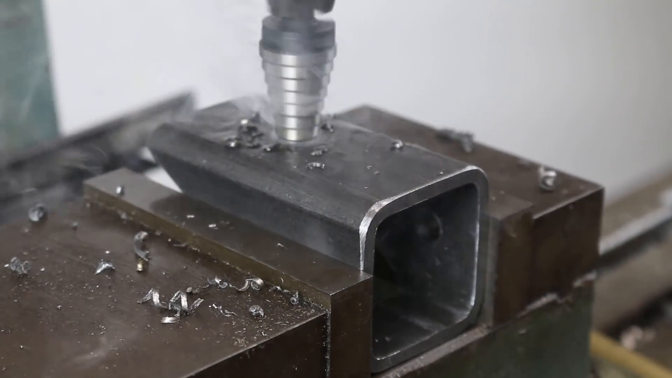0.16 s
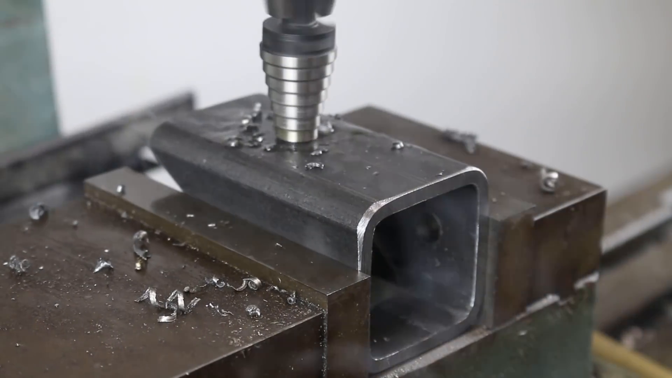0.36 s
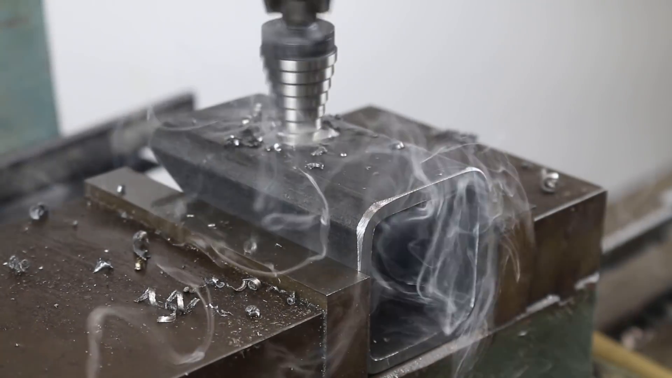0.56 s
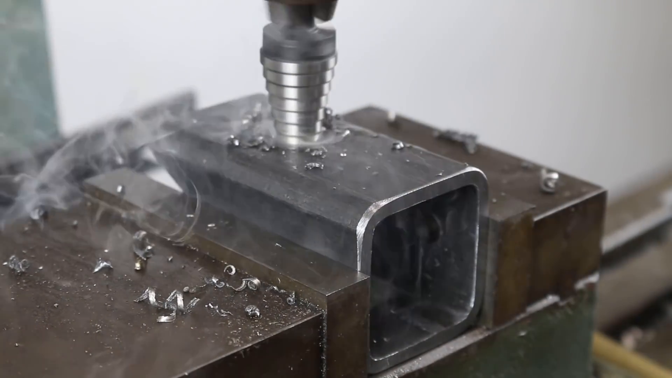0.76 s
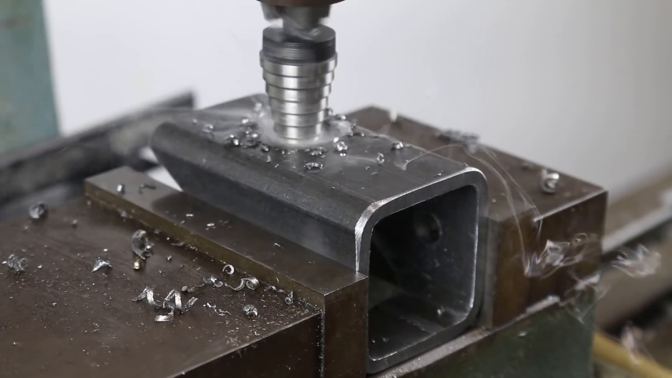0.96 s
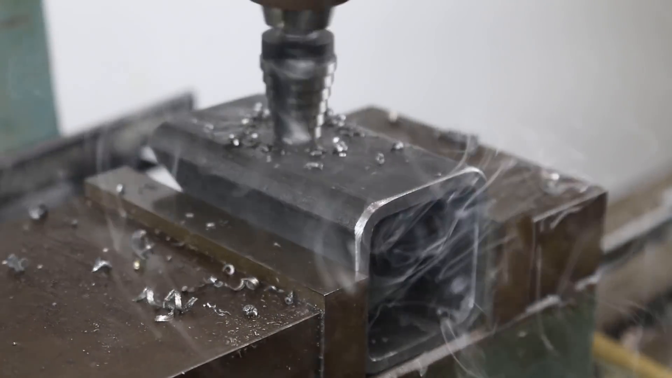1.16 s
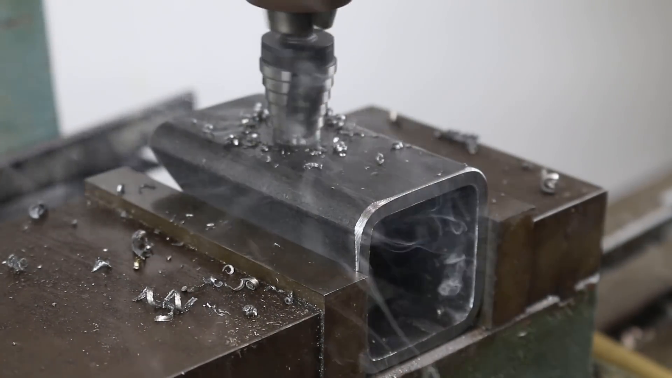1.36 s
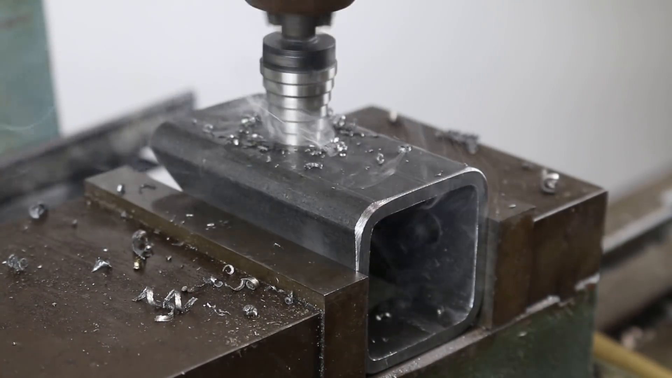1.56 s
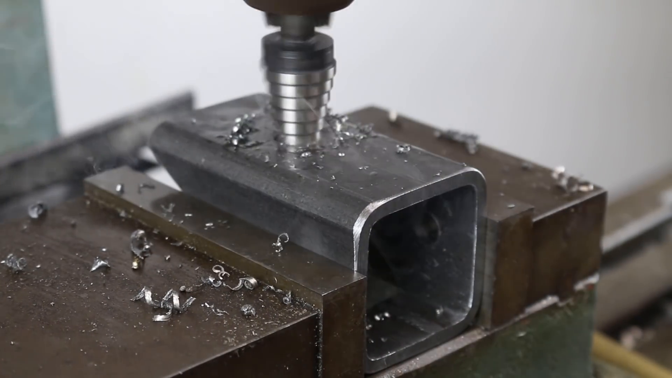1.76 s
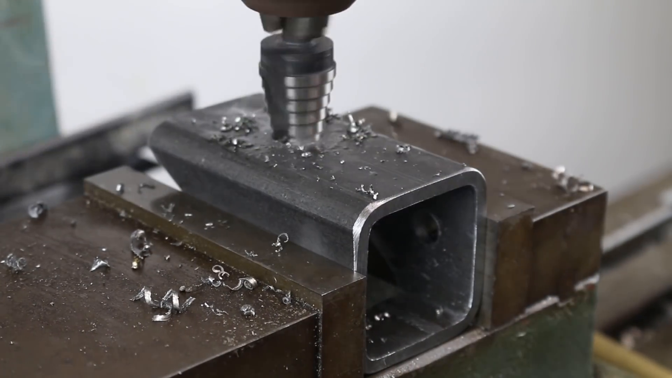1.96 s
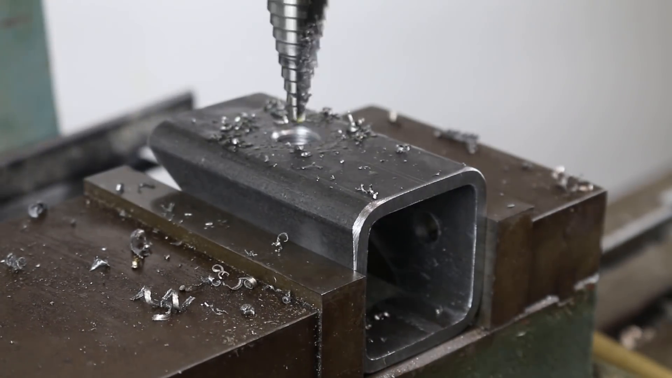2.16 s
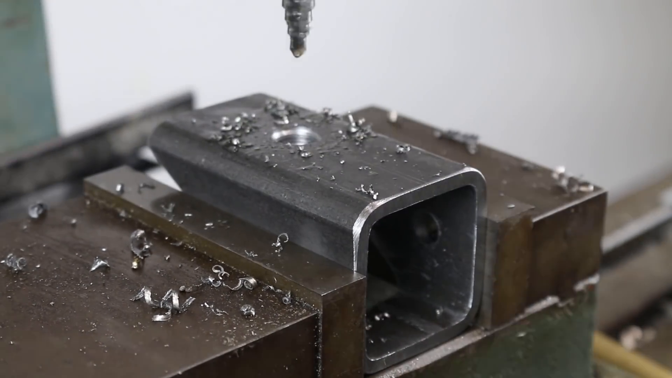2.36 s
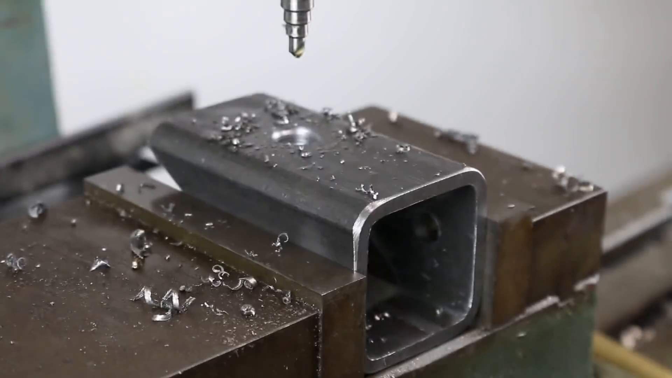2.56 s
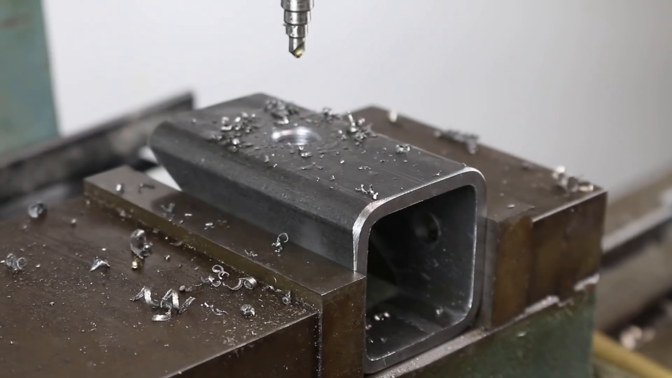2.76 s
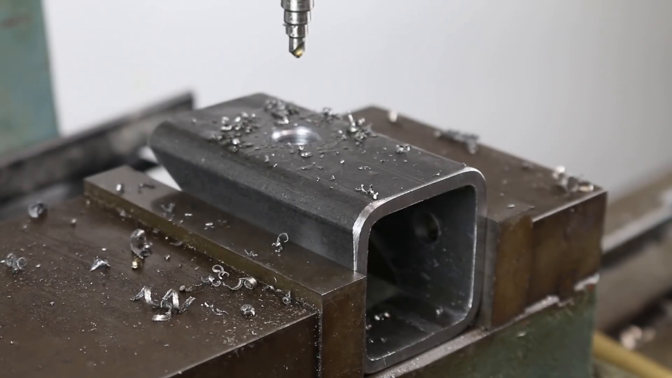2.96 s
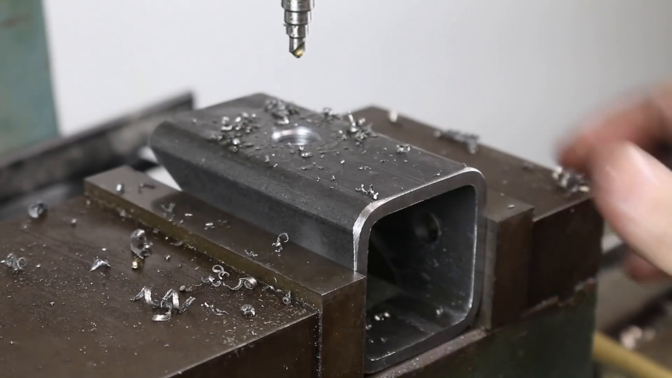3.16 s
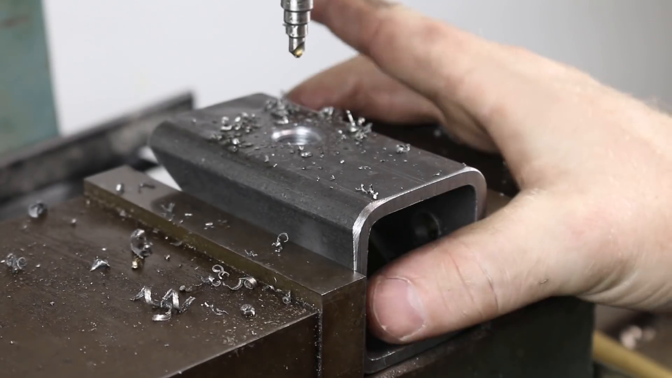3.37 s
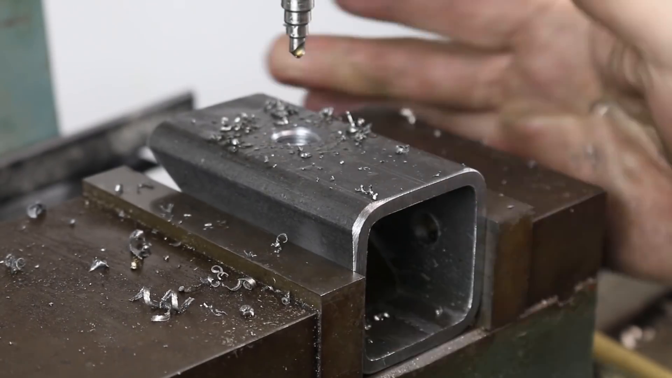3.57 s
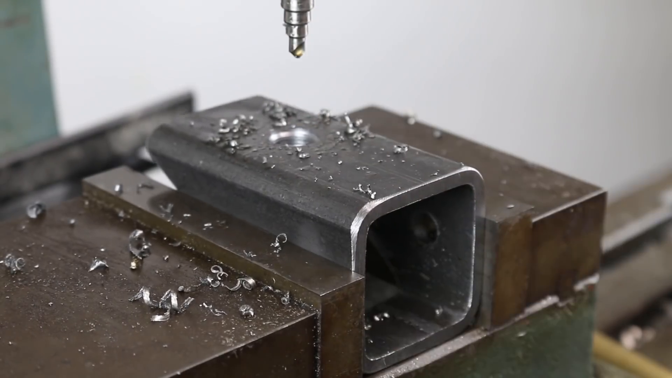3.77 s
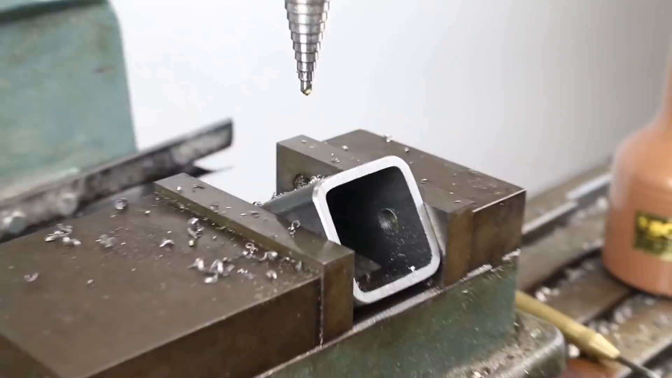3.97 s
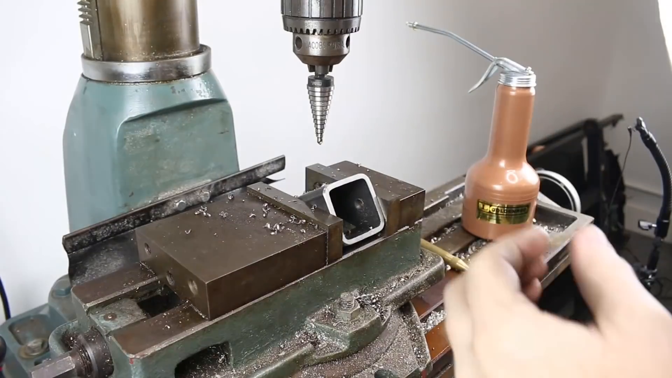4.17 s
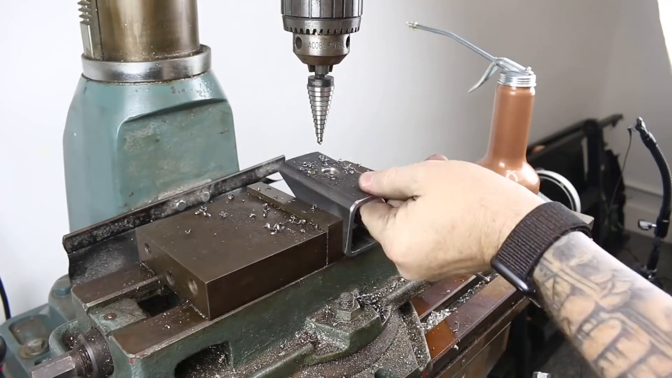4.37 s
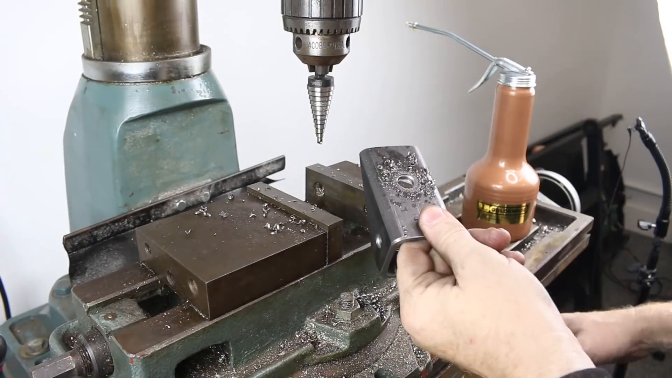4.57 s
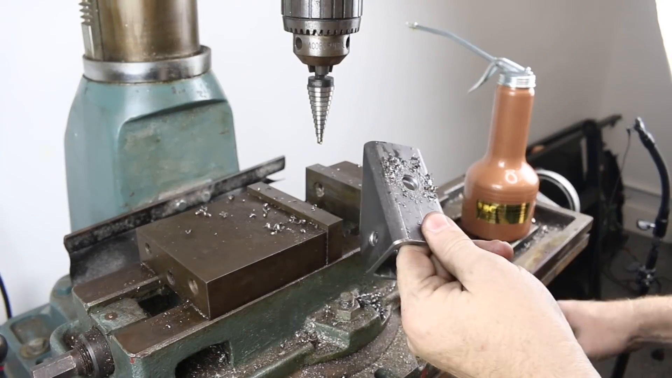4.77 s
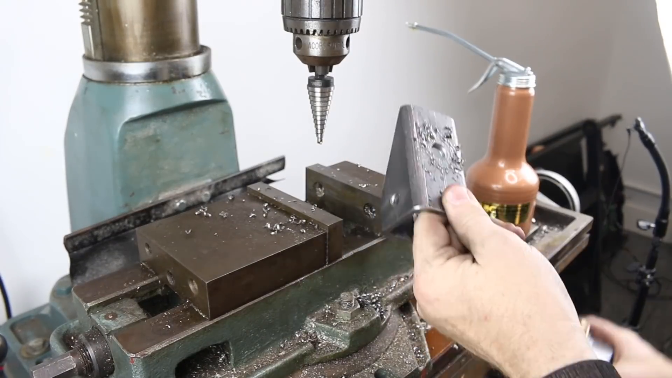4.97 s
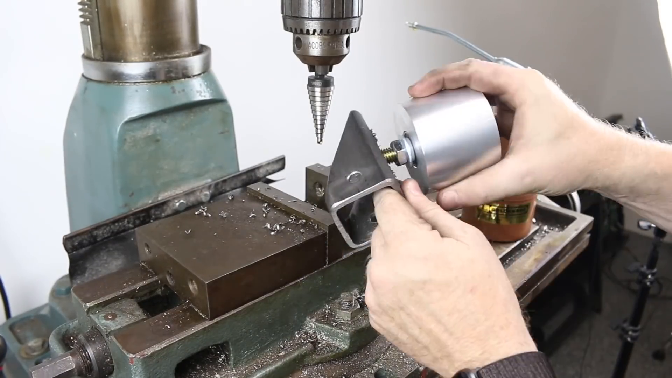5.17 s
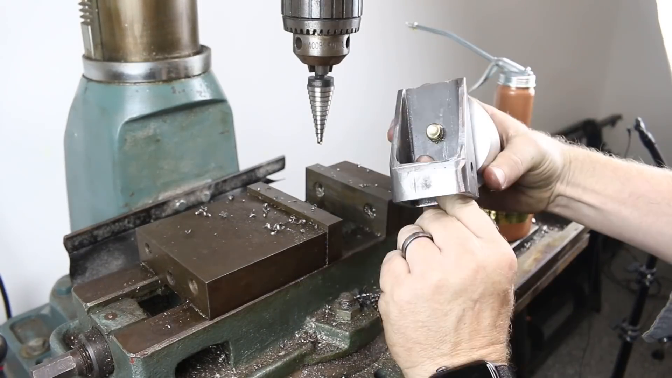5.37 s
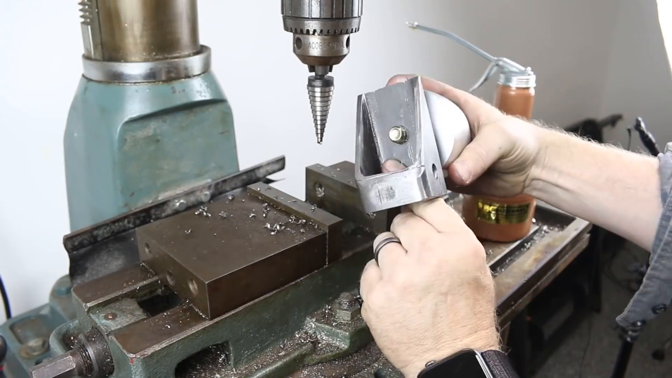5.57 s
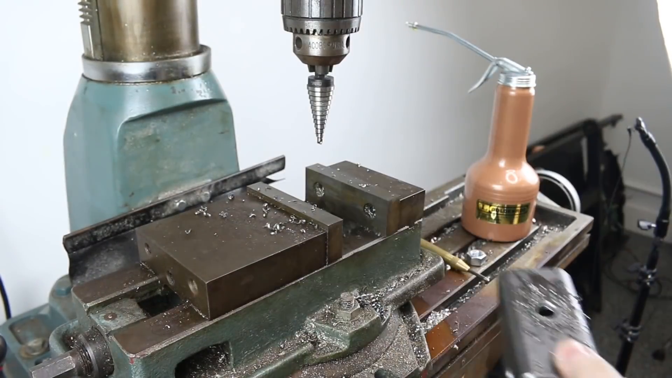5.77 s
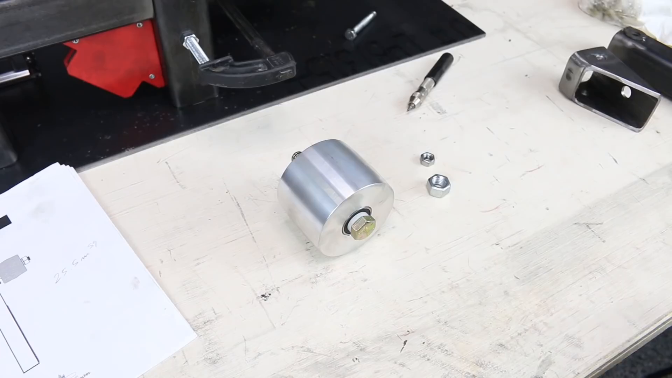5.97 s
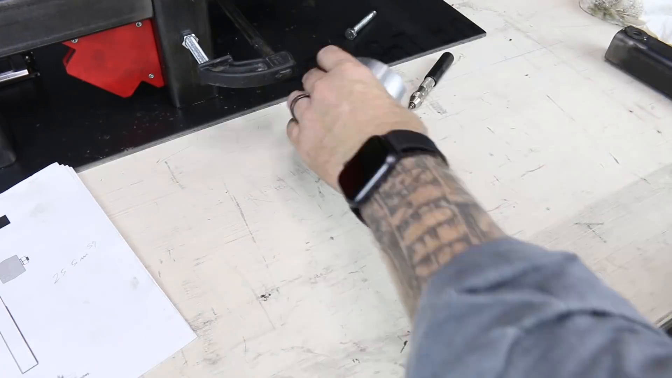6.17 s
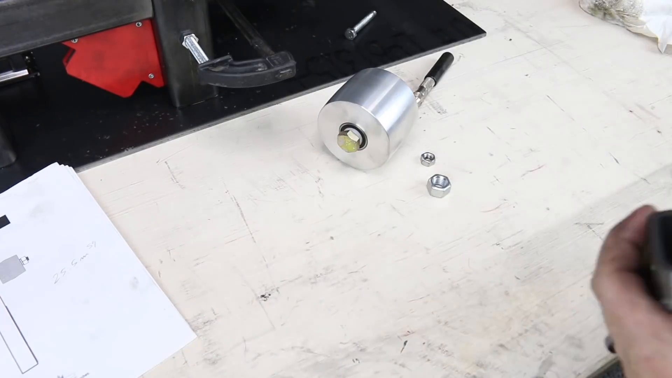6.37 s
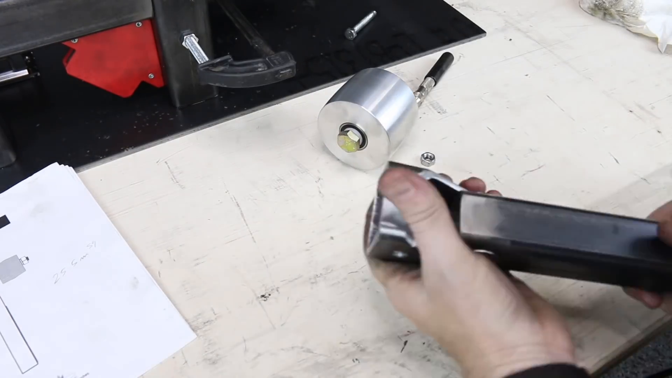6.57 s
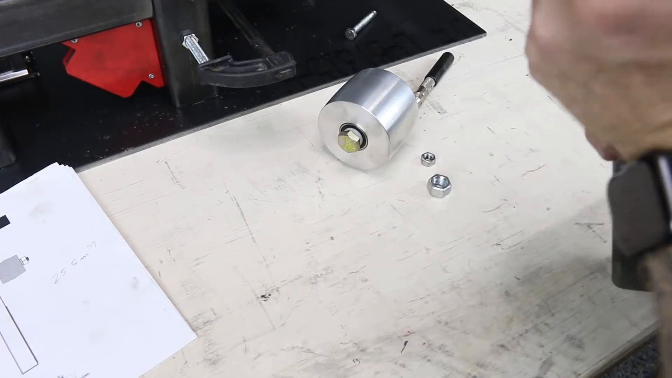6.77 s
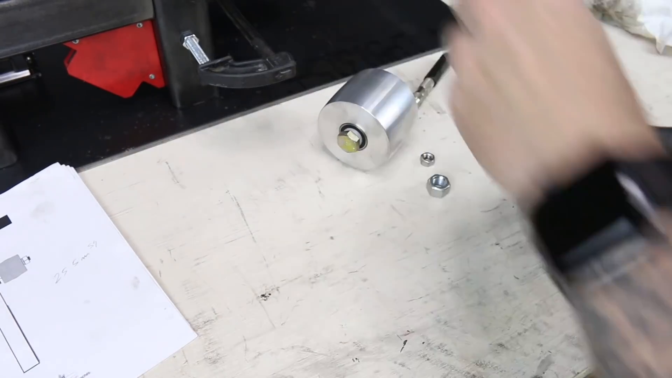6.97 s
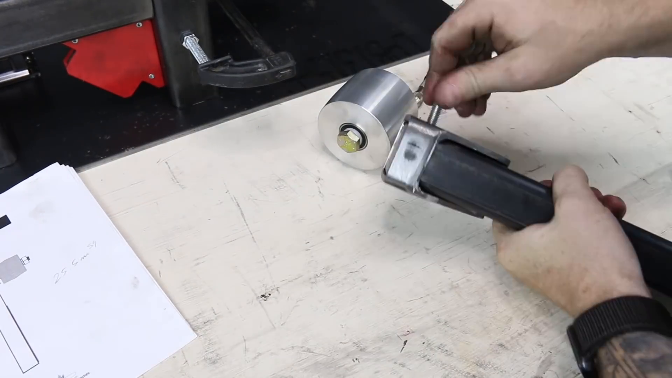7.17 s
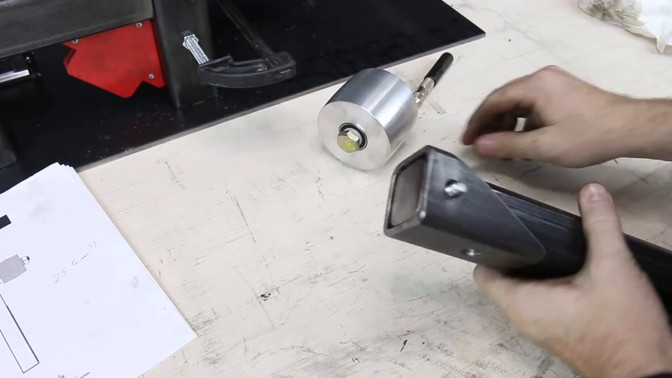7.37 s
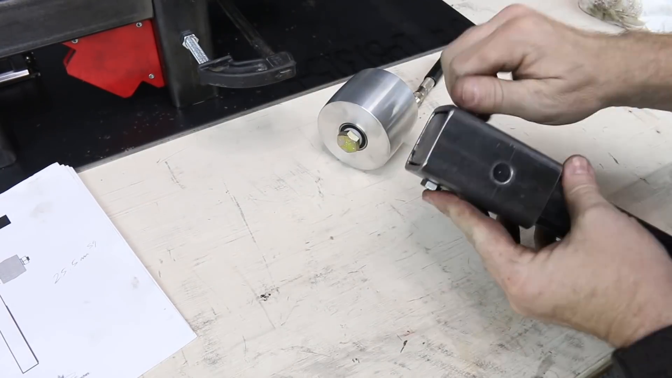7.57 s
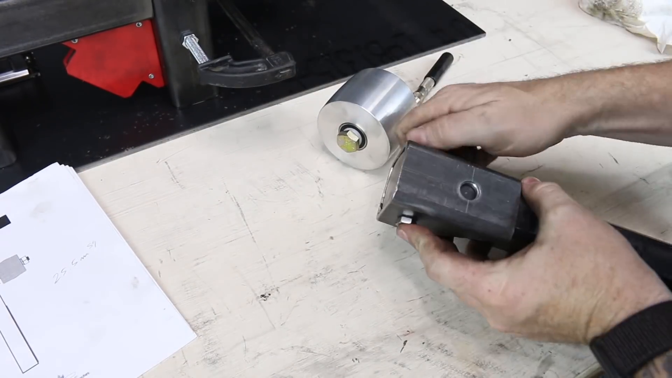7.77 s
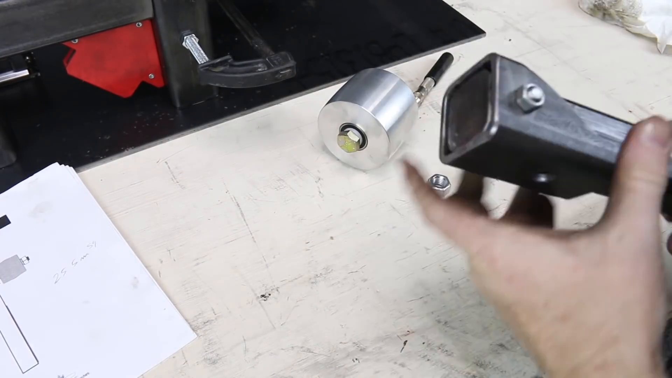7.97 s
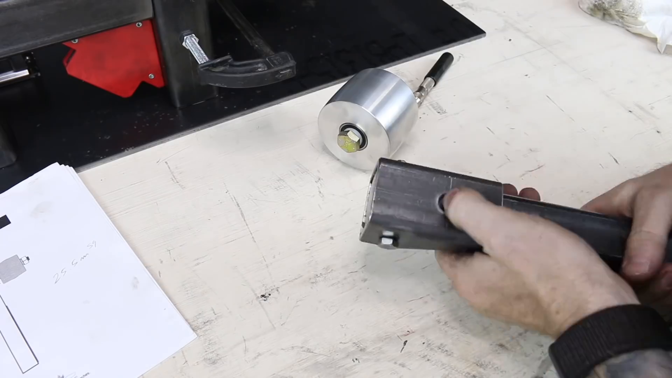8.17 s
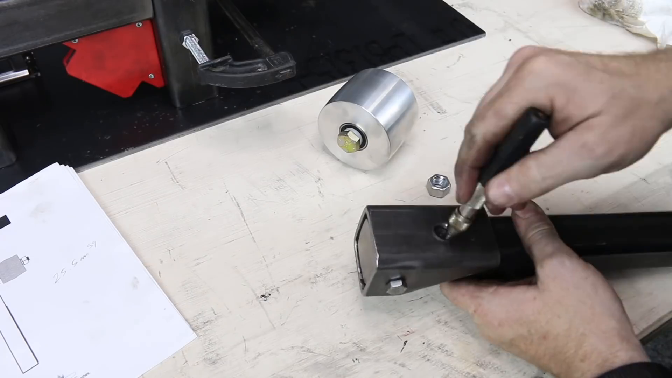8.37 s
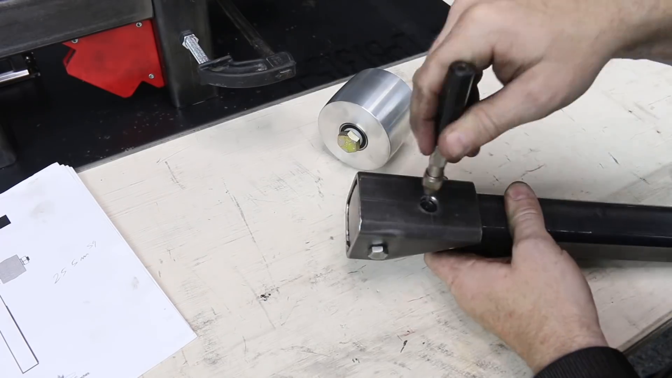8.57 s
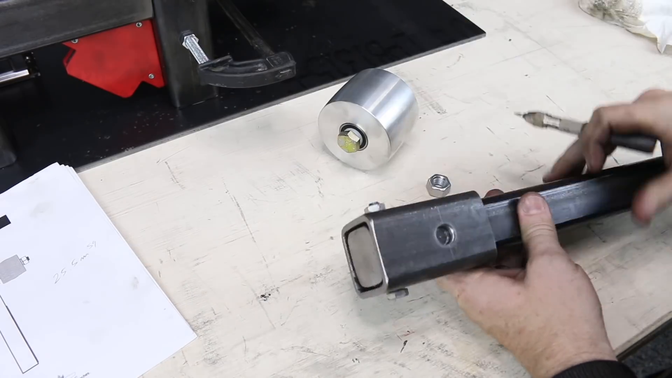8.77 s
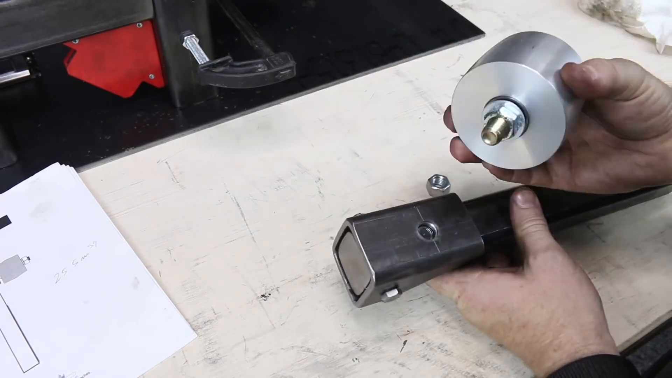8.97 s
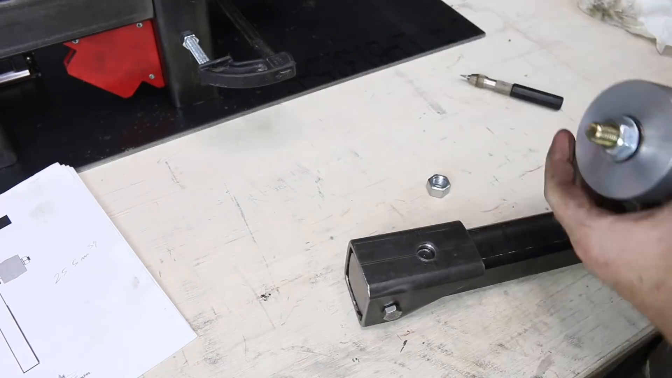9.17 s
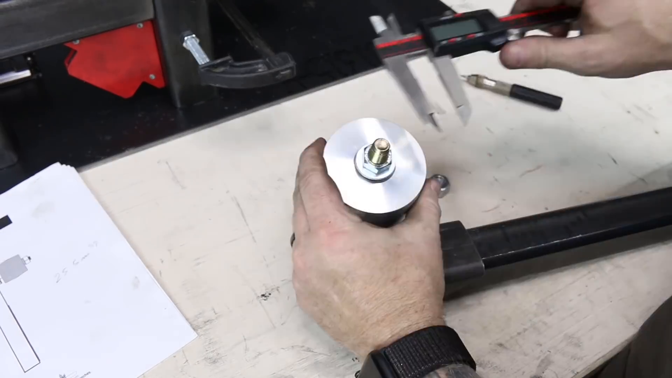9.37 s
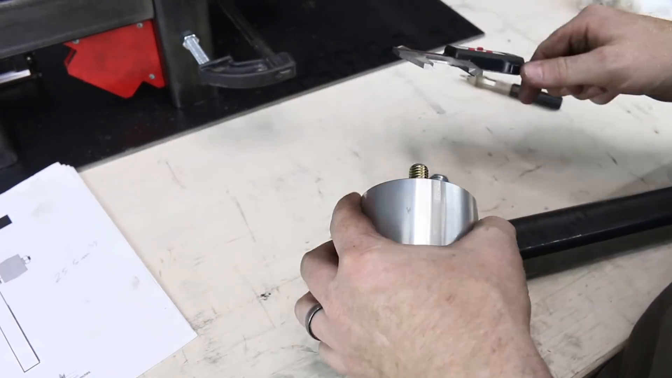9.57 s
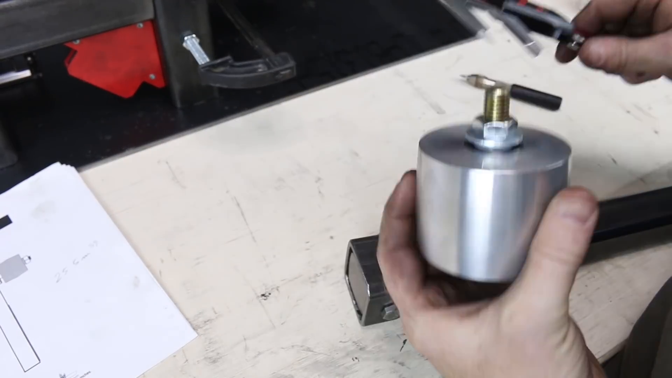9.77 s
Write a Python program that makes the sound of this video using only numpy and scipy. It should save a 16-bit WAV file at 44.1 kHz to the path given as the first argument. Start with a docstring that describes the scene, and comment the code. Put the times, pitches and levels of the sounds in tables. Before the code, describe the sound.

Close, thin, nearly mono sound in a small workshop. A fast, high-pitched drill press motor whines while its bit grinds and growls through steel tube, hissing with chips and squealing sharply as it breaks through. It runs free briefly and switches off. Vise and tube then rattle and clank, loose chips tick and skitter, the tube is set down with hard knocks, and finally parts and tools tap sparsely on a bench.

```python
"""Small workshop, at the drill press, then at a bench; fast motion, so all pitches lie high; thin, near-mono mic.
The motor hums in sine tones and noise; the bit tears a steel tube in random grains that ring it, hiss and squeal,
breaks through, runs free and stops. Vise and tube knock as cracks, rattles and ringing modes; loose chips skitter.
Then the ear moves to the bench: parts and tools tap and scuff its top in the same ways. Each place has its own
noise floor of shaped noise."""
import sys
import numpy as np
from scipy import signal
from scipy.fft import rfft, irfft, next_fast_len
from scipy.io import wavfile

SR = 44100
rng = np.random.default_rng(int(sys.argv[2]) if len(sys.argv) > 2 else 0)


def master(y):
    """Save y as 16-bit WAV."""
    cut = np.clip(np.atleast_2d(y).T, -1, 1)
    pcm = np.round(cut * 32767)  # scale
    wavfile.write(sys.argv[1], SR, pcm.astype(np.int16))


N = 433501
TIME = np.arange(N) / SR
RUN = TIME[:round(2.85 * SR)]   # the drill sounds within this time
STOP_S, MOVE_S = 2.617, 5.973   # the switch is thrown; the ear moves to the bench

# All table levels are relative within their layer unless called rms.
# magnetic hum of the motor [multiple of HUM_HZ, rms level/dB before load and wavering]
HUM = [(1, -50), (2, -52), (3, -43.5), (4, -53.5), (5, -46.5), (7, -60), (8, -72)]
HUM_HZ = 960
EARLY_S = 0.0098   # hum and bright cutting sounds begin to die this much before STOP_S
# load on the motor: lifts the hum fully, motor noise in part, and the chips [t/s, level/dB]
LOAD = [(0, -3), (.5, 1.5), (1.8, 1.5), (2.0, 3), (2.15, -6), (2.6, -4)]
# smaller shaft and gear tones [mean f/Hz, mean rms level/dB]
SHAFTS = [(262, -73.5), (527, -63), (662, -59), (1190, -54), (1224, -54.5), (1655, -53.5), (2052, -57.5),
          (4668, -52), (4734, -59.5)]
# gear mesh, slowed and damped by the cut [idle f/Hz, idle rms level/dB, then per dB of cut above idle:
# f lost/Hz, level lost/dB, wavering/dB]
MESH = [(794.6, -30.5, 0.26, 0.49, 0.08), (830, -37.5, 0.019, 0.37, 0.16)]
MESH_T60_S = .3
# motor noise spectrum [f/Hz, density/dB per Hz]
MOTOR = [(88, -91.5), (150, -59), (440, -37.5), (560, -40), (760, -24), (1040, -21), (1210, -20.5),
         (2600, -22), (2920, -21.5), (3620, -29), (4760, -21), (7000, -30), (16000, -40)]
MOTOR_DB = -40   # before load
# resonances of the motor casing [f/Hz, width/Hz, level/dB]
CASING = [(1750, 74, 1), (2050, 580, -8), (4720, 290, 3.5), (5440, 210, 2.5), (10300, 330, -6.5)]

# resonances of tube and vise under the bit [f/Hz, width/Hz, level/dB]
TUBE = [(481.2, 23.7, 1), (572, 67, -4.5), (597.3, 31, -2), (747, 6, 5.5), (777, 58, -18.5),
        (857, 110, 0.5), (904, 28, -3.5), (1160, 21, -2), (1380, 54, 1), (1693, 30, -5), (2370, 140, -8.5),
        (3940, 24, -6.5), (4300, 39, -4.5), (5430, 40, -11), (5550, 1040, -17)]
# spectrum of the cut itself [f/Hz, density/dB per Hz]
CUT = [(250, -61), (430, -19), (798, -8), (1080, 5), (2630, -45), (2820, 4.5), (3390, -15), (4760, 2.5),
       (7000, -14), (9100, -52)]
# how hard the edge cuts [t/s, level/dB]
FEED = [(0, -48.5), (.24, -48.5), (.36, -54.5), (.52, -46), (.66, -42), (.79, -47.5), (1.1, -48.5),
        (1.32, -43.5), (1.58, -47.5), (1.68, -41.5), (1.86, -51), (1.96, -44.5), (2.05, -41), (2.16, -62.5),
        (2.6, -60)]
IDLE_DB = -65   # feed level below which the mesh is undisturbed
# the edge digs in and the tube growls [t/s, length/s, level/dB]
BITES = [(.88, 0.032, -42.5), (.99, 0.031, -36.5), (1.08, 0.061, -42), (1.22, 0.042, -45),
         (1.995, 0.022, -35.5)]
BITE_RISE_S, BITE_FALL_S = 0.035, 0.037   # swell and die by 20 dB
GROWL_HZ, GROWL_DB = 700, -3   # a bite adds the cut below this pitch, at this level
# spectrum of the chip hiss [f/Hz, density/dB per Hz]
CHIPS = [(3530, -40), (6000, -2), (7190, -13.5), (10100, -3.5), (12200, -8.5), (14900, -8), (16000, -16)]
# where the chips hiss most, swelling slowly [f/Hz, width/Hz, level/dB]
CURLS = [(10480, 280, -6.5), (13700, 120, -11.5), (14550, 220, 11), (15430, 350, 3)]
CHIPS_DB, CHIPS_FOLLOW, CHIPS_UNDER_RASP_DB = -46, 1, -10   # at 0 dB load; share of load; in a rasp
# resonances of the squeal [f/Hz, width/Hz, level/dB]
SQUEAL = [(3180, 200, -4), (3520, 260, -3), (3800, 200, -2), (4030, 120, -1), (5500, 900, -10.5)]
# the edge rasps and squeals [t/s, length/s, level/dB]
RASPS = [(.263, 0.036, -39.5), (.365, 0.0076, -40), (.66, 0.013, -44), (.985, 0.022, -45),
         (1.076, 0.019, -39.5), (1.135, .015, -41), (1.218, 0.041, -44), (1.73, 0.028, -43),
         (1.80, 0.044, -37), (1.836, 0.071, -32.5), (1.975, 0.0055, -40), (1.9955, 0.0075, -25),
         (2.016, 0.0074, -29.5), (2.035, 0.095, -40)]
RISE_S, FALL_S = 0.005, 0.011   # a rasp swells and dies by 20 dB
THROUGH_S, THROUGH_DB = 1.96, 0   # as the wall thins the rasp leans on its lowest pitch
CHATTER_DB = -7.5   # sharp broad clicks within a rasp
RASP_UNDER_CUT_DB = -3   # steady rasp between the bursts

# knocks at the machine [t/s, level/dB, bass level/dB, treble level/dB, middle-band t60/s, favoured f/Hz]
KNOCKS = [(2.602, -47.5, -30, 13.5, .04, 10000), (2.6434, -37, -19, 1, 0.038, 5300),
          (2.851, -48, -8, -10, 0.095, 5160), (2.859, -38.5, -2.5, 1.5, 0.12, 5050),
          (3.1012, -37.5, -8.5, 2, 0.1, 11000), (3.137, -44.5, -3, 4, 0.11, 10400),
          (3.1495, -45.5, 1, -2, 0.2, 5500), (3.2091, -43, 1, -5, 0.22, 4900),
          (3.2503, -50.5, 4, -30, 0.19, 3220), (3.307, -47, 11, -2.5, 0.13, 2010),
          (3.3443, -55, 10, -29, 0.087, 1930), (3.3985, -56, 15, 2.5, 0.13, 2340),
          (3.4178, -50, 6.5, -12, 0.09, 2120), (3.4483, -44, 6, -5.5, 0.16, 2500),
          (3.4934, -63.5, 19.5, 13, 0.09, 1980), (3.554, -60, 12.5, -3, 0.22, 2360),
          (3.6177, -57, 6.5, -15, 0.15, 3180), (3.663, -38, -3, -16, 0.098, 3700),
          (3.6728, -41, -31, -6, 0.14, 2960), (3.698, -50, -22, 12, 0.014, 9000),
          (3.707, -31, -1, 2, 0.12, 6150), (3.7772, -29.5, 0.5, 5, 0.18, 9650),
          (3.7895, -29.5, -2, -5, 0.066, 6300), (3.8273, -20, -7.5, -10, 0.12, 5400),
          (3.864, -32.5, -16, 5.5, 0.031, 6450), (4.1767, -46, -13, 2, 0.014, 4640),
          (4.187, -58, -25, 7, 0.092, 2230), (4.251, -42, -21, 2.5, 0.017, 3950),
          (4.3114, -57, -25, 9, 0.16, 8980), (4.4153, -51, 3.5, 0, 0.47, 3300),
          (4.4306, -43.5, 6, 8.5, 0.079, 9500), (4.4776, -40.5, 4.5, 0, 0.19, 4220),
          (4.49, -30.5, -2, 1.5, 0.089, 3300), (4.717, -54.5, 7.5, -6, 0.31, 2040),
          (4.9188, -58, -5, 5.5, 0.095, 2480), (5.002, -54.5, 7.5, -5, 0.14, 1980),
          (5.0228, -49.5, 4, -1, 0.085, 2040), (5.8239, -19.5, -5, -3.5, 0.11, 4020),
          (5.8612, -20.5, -2, -3, 0.061, 4030), (5.8656, -41.5, 10, 9.5, 0.14, 2040)]
LIFT_S, DOWN_S = 4.4, 5.8   # knocks between fall on the tube in the hand, later ones as it is laid down
# ringing modes of the vise [mean f/Hz, level/dB, longest t60/s]
VISE = [(497, -9, 0.18), (808, -1, 0.2), (847, -7, 0.15), (1168, -7.5, 0.2), (1361, -2.5, 0.15),
        (2020, 7, 0.14), (2500, -1, 0.23), (3200, -0.5, 0.2), (4060, -4.5, 0.25), (5200, -12.5, 0.022),
        (5730, -9, 0.066), (5400, -21, 0.13), (630, -24, 0.087)]
# ringing modes of the tube in the hand [mean f/Hz, level/dB, longest t60/s]
LIFTED = [(1143, -6, 0.13), (1677, 6, 0.17), (1960, 2, 0.15), (3020, -5, .08), (3100, 3, .12),
          (4330, 0, .15), (4970, -5, .05), (5400, 5, 0.036)]
# ringing modes of the tube laid on the machine table [mean f/Hz, level/dB, longest t60/s]
SET_DOWN = [(800, -12, 0.11), (1210, -0.5, .2), (1310, -3, 0.08), (1980, 13, 0.15), (3230, 1, .12),
            (3870, -11, .05), (4350, -11, .1), (5740, 4, 0.044)]
SNAP_DB, SNAP_T60_S = -17, 0.0041   # brief extra rattle at the start, relative to the rattle
SHIFT = .014   # grip and seating move each mode from blow to blow (spread, share of pitch)

# loose chips slide off the lifted tube in jerks [t/s, level/dB]
JERKS = [(4.627, -46), (4.663, -50), (4.69, -59), (4.717, -52), (4.751, -54), (4.786, -54), (4.826, -52.5)]
JERK_RISE_S, JERK_FALL_S = 0.011, 0.031   # swell and die by 20 dB
# single chips drop with a tick [t/s, level/dB]
TICKS = [(3.0, -58), (3.2, -56), (3.267, -61), (3.343, -58), (3.391, -56), (3.419, -53), (3.462, -52),
         (3.472, -55), (5.313, -51), (5.723, -56)]
TICK_RISE_S, TICK_FALL_S = .001, .01   # swell and die by 20 dB
# spectrum of loose chips on steel [f/Hz, density/dB per Hz]
SWARF = [(500, -14), (1300, -5.5), (4000, -4.5), (8300, 0), (12000, -8), (16000, -4)]
# peaks raised in that spectrum [f/Hz, width/Hz, level/dB]
SWARF_RINGS = [(8360, 410, 9), (9700, 240, 12)]

# taps on the bench [t/s, level/dB, bass level/dB, treble level/dB, favoured f/Hz]
TAPS = [(6.074, -52, -19, 7, 9000), (6.082, -49, -1, 3.5, 11000), (6.1405, -55, -20, 4, 5000),
        (6.1692, -30, -20, -5, 4450), (6.1894, -51, -19, 6, 5000), (6.244, -16.5, -30, -3.5, 3930),
        (6.334, -49, 3, 3.5, 1920), (6.526, -64, -20, 9, 12000), (6.6297, -55.5, -28, 9.5, 6220),
        (6.675, -65, -20, 12.5, 9000), (6.7405, -35.5, 2.5, -37, 2520), (6.8109, -53, 4, -14, 2330),
        (7.0114, -59, -15, 9, 9000), (7.196, -43, 2, -27, 2490), (7.2034, -43.5, 2, -19, 2440),
        (7.2394, -50, 4, -22, 2350), (7.2786, -49, 9.5, -7, 2350), (7.4173, -21, -5, -7.5, 2970),
        (7.4332, -30, -8, -24, 6900), (7.4425, -25, -6, -15, 3100), (7.4472, -22, -4, -7.5, 2960),
        (7.476, -47, -30, 5.5, 4960), (7.8755, -47, 3, -22, 2880), (7.9152, -41.5, -1, -22, 2280),
        (7.9963, -45, 0, -17, 2730), (8.1494, -65, -19, 12.5, 7950), (8.3205, -46.5, -25, 4, 5000),
        (8.3245, -38.5, -2, -22, 2400), (8.3433, -26, -3, -37, 2900), (8.835, -42.5, 2.5, -28.5, 2190),
        (8.8437, -49, -23, -12, 2100), (8.8689, -38, -40, 13, 8770), (8.877, -32, -40, 6, 8900),
        (8.8855, -31, -40, 7.5, 8770), (9.042, -52, -18, -16, 3200), (9.1503, -34.5, -4, -38, 3000),
        (9.1798, -26.5, -1.5, -5.5, 2570), (9.1864, -35, -5, -39, 2630), (9.2732, -44, -3, -3, 5400),
        (9.2894, -51.5, -29, 14, 4970), (9.443, -36, -8, -31, 3140), (9.4557, -39, -27, -27, 3500)]
TAP_T60_S = 0.032   # middle band
# ringing modes of the bench and what lands on it [mean f/Hz, level/dB, longest t60/s]
BENCH = [(850, -6, 0.087), (1640, -4, 0.19), (1920, -1.5, 0.09), (2140, -5.5, 0.045), (2345, -1, 0.11),
         (2807, -10.5, 0.1), (3220, -9, 0.039), (3700, -10, 0.075), (4760, -8, 0.0083),
         (5650, -5.5, 0.0047), (7070, -2, 0.051), (9000, -15, 0.014)]
# parts slide on the bench around some of the taps [t/s, length/s, level/dB]
SCUFFS = [(7.885, 0.0079, -57), (9.135, 0.023, -52.5), (9.29, 0.019, -60.5)]
SCUFF_RISE_S, SCUFF_FALL_S = 0.029, 0.01   # swell and die by 20 dB
# spectrum of the scuffs [f/Hz, density/dB per Hz]
SCUFF = [(500, -25), (900, -15), (1800, 1), (2600, -1), (5000, -17), (16000, -21)]

# air at the machine [f/Hz, density/dB per Hz]
SHOP_AIR = [(15, -97), (25, -39.5), (127, -20.5), (190, -8.5), (476, -8), (624, -13), (863, -10.5),
            (1230, -14.5), (2110, -7), (2760, -11.5), (16000, -27.5)]
# peaks raised in that air [f/Hz, width/Hz, level/dB]
SHOP_TONES = [(345.6, 28, 10), (464, 12, 12.7), (515, 42, 9.5)]
# air at the bench [f/Hz, density/dB per Hz]
BENCH_AIR = [(15, -36), (25, 1.5), (100, -14), (300, -9.5), (480, -5.5), (714, -4), (1370, -7), (2280, -3),
             (4870, -5), (5280, -6.5), (8000, -12), (16000, -17.5)]
# peaks raised in that air [f/Hz, width/Hz, level/dB]
BENCH_TONES = [(512, 5, 12), (650, 5, 15), (703, 9, 15), (745, 4, 17), (1860, 24, 10), (2326, 74, 9.7),
               (2930, 150, 4.2), (3250, 110, 6.5), (4700, 110, 4.1)]
SHOP_DB, BENCH_DB, SIDE_DB = -65, -62, -91.5   # rms
RUMBLE_DB, RUMBLE_RUNNING_DB = -86.5, -95   # before wavering: after STOP_S, and before it
CUTOFF_HZ = 15780


def amp(db):
    """dB to gain."""
    return 10 ** (np.asarray(db) / 20)


def rms_one(x):
    """Scale to rms 1."""
    return x / np.sqrt(np.mean(x ** 2) + 1e-20)


def in_time(rows):
    """Level of a (t, dB) curve, one value a sample while the drill sounds."""
    s, db = np.transpose(rows)
    return np.interp(RUN, s, db)


def band(x, low_hz, high_hz, order=2):
    """Butterworth band-pass."""
    return signal.sosfilt(signal.butter(order, [low_hz, min(high_hz, 20000)], "band", fs=SR, output="sos"), x)


def resonate(x, hz, width):
    """One two-pole resonance, of gain about 1 at its peak."""
    r = np.exp(-np.pi * width / SR)
    return signal.lfilter([1, 0, -1], [1, -2 * r * np.cos(2 * np.pi * hz / SR), r * r], x) * (1 - r * r) / 2


def drift(rate, size):
    """Slow random wandering of spread 1: low-passed noise, drawn every 20 samples."""
    r = np.exp(-40 * np.pi * rate / SR)
    noise = rng.standard_normal(size // 20 + 2002)
    slow = signal.lfilter([1], [1, -2 * r, r * r], noise)[2000:]   # settled part
    return np.interp(np.arange(size) / 20, np.arange(len(slow)), rms_one(slow))


def coloured(x, spectrum, bumps=()):
    """Shape noise by a spectrum, raised by (Hz, width, dB) bumps; rms 1."""
    size = next_fast_len(len(x))
    hz = np.arange(size // 2 + 1) * SR / size + 1
    corner_hz, corner_db = np.transpose(spectrum)
    level_db = np.interp(np.log(hz), np.log(corner_hz), corner_db)
    for centre_hz, width, db in bumps:
        level_db = level_db + db / (1 + (2 * (hz - centre_hz) / width) ** 2)
    return rms_one(irfft(rfft(x, size) * amp(level_db), size)[:len(x)])


def resonances(x, modes, patchy_db, rate):
    """Parallel steep resonances (each applied twice), swelling and sinking on their own; rms 1."""
    total = 0
    for hz, width, db in modes:
        ringing = resonate(resonate(x, hz, width), hz, width)
        total = total + amp(db + patchy_db * drift(rate, len(x))) * ringing
    return rms_one(total)


def grains(per_s, spread_db, size):
    """Random clicks of uneven size; rms 1."""
    sizes = amp(spread_db * np.minimum(rng.exponential(1, size), 5)) * rng.standard_normal(size)
    return rms_one(sizes * (rng.random(size) < per_s / SR))


def bursts(rows, time, rise_s, fall_s):
    """Summed gain of (s, length s, dB) bursts: swell, hold, die."""
    gain = 0
    for s, length, db in rows:
        before = np.maximum((s - time) / rise_s, 0)
        after = np.maximum((time - s - length) / fall_s, 0)
        gain = gain + amp(db - 20 * before - 20 * after)
    return gain


def air():
    """Room noise at the machine, then at the bench, over a faint lumpy rumble."""
    shop = amp(SHOP_DB) * coloured(rng.standard_normal(N), SHOP_AIR, SHOP_TONES)
    bench = amp(BENCH_DB) * coloured(rng.standard_normal(N), BENCH_AIR, BENCH_TONES)
    rumble_db = np.where(TIME < STOP_S, RUMBLE_RUNNING_DB, RUMBLE_DB) + 5.3 * drift(2.7, N)
    rumble = amp(rumble_db) * rms_one(band(rng.standard_normal(N), 8.1, 95))
    return np.where(TIME < MOVE_S, shop, bench) + rumble


def coast(drop_db, t60, early_s=0):
    """Gain 1 while the motor pulls; at the switch a sudden drop, then a decay."""
    after = np.maximum(RUN - STOP_S + early_s, 0)
    return amp(drop_db * np.minimum(after / 0.0015, 1) - 60 * after / t60)


def tone(hz, db):
    """A sine of given rms level, integrating its pitch to phase."""
    turns = np.cumsum(hz + 0 * RUN) / SR + rng.random()
    return np.sqrt(2) * amp(db) * np.sin(2 * np.pi * turns)


def motor_tones(feed_db, load_db):
    """Gear mesh, hum and shaft tones; hum and shafts drop sharply at the end, the mesh rings out."""
    size = len(RUN)
    depth_db = np.maximum(feed_db - IDLE_DB, 0)
    mesh = 0
    for hz, db, sag, damp, waver in MESH:
        waver_db = .5 + waver * depth_db + 3 * (RUN > STOP_S)
        mesh = mesh + tone(hz - sag * depth_db, db - damp * depth_db + waver_db * drift(31, size))
    hum = sum(tone(k * HUM_HZ, db + drift(10, size)) for k, db in HUM) * amp(load_db)
    shafts = sum(tone(hz * (1 + 0.00122 * drift(6.0, size)), db + 0.94 * drift(28, size))
                 for hz, db in SHAFTS)
    return (mesh * coast(drop_db=-5.5, t60=MESH_T60_S)
            + (hum + shafts) * coast(drop_db=-17.5, t60=.1, early_s=EARLY_S))


def motor_noise(load_db):
    """Motor noise, and the casing resonances that it excites."""
    white = rng.standard_normal(len(RUN))
    noise = coloured(white, MOTOR) + amp(-8) * resonances(white, CASING, patchy_db=1, rate=30)
    return amp(MOTOR_DB + 0.32 * load_db) * noise


def tube_cut(feed_db):
    """The edge tears chips in random grains that shake the tube; bites add a low growl."""
    size = len(RUN)
    tearing = grains(6500, spread_db=2.5, size=size) * amp(1.2 * drift(65.5, size))
    body = resonances(tearing, TUBE, patchy_db=-0.5, rate=10)
    cut = band(body + amp(-5.5) * coloured(tearing, CUT), 510, 9600, order=4)
    growl = amp(GROWL_DB) * band(cut, 370, GROWL_HZ)
    biting = bursts(BITES, RUN, BITE_RISE_S, BITE_FALL_S)
    return amp(6.5) * (amp(feed_db) * cut + biting * (amp(-9.5) * cut + growl))


def chips_and_rasp(feed_db, load_db):
    """Chips hiss as dense grains; rasps drive the squeal resonances and chatter in sparser clicks."""
    size = len(RUN)
    curling = grains(9000, spread_db=2.0, size=size)
    hiss = amp(2.5 * drift(1.7, size)) * coloured(curling, CHIPS)
    chips = hiss + amp(-8.5) * resonances(curling, CURLS, patchy_db=7.5, rate=3)
    squeal = resonances(grains(9000, spread_db=2.0, size=size), SQUEAL, patchy_db=1, rate=40)
    rasp = squeal * amp(2.0 * drift(200, size) - .5)   # fast uneven level
    rasp += amp(THROUGH_DB) * (RUN > THROUGH_S) * resonate(rasp, 3200, 210)
    chatter = band(grains(1500, spread_db=2.0, size=size), 1000, 13000)
    rasping = bursts(RASPS, RUN, RISE_S, FALL_S)
    chips_gain = amp(CHIPS_DB + CHIPS_FOLLOW * load_db) + amp(CHIPS_UNDER_RASP_DB) * rasping
    rasp_gain = amp(feed_db + RASP_UNDER_CUT_DB) + rasping
    return chips_gain * chips + rasp_gain * rasp + amp(CHATTER_DB) * rasping * chatter


def drill():
    """Motor and cut together; each part dies away in its own time at the switch."""
    feed_db, load_db = in_time(FEED), in_time(LOAD)
    dull = motor_noise(load_db) + tube_cut(feed_db)
    bright = chips_and_rasp(feed_db, load_db)
    return (motor_tones(feed_db, load_db) + dull * coast(drop_db=-5, t60=0.45)
            + bright * coast(drop_db=-4, t60=0.39, early_s=EARLY_S))


def blows(events, modes, low_hz, ring_db, held, crack_db, tail_db, tail_t60, top_hz):
    """Crack, rattle decaying in three bands, faint room tail, and modes damped to held times the rattle."""
    age = TIME[:SR // 4]
    out = np.zeros(N + SR // 4)
    modes_hz = np.array(modes)[:, 0]
    chance = rng.normal(0, 2.2, (len(events), len(modes)))   # dB, each mode in each blow
    shifts = 1 + SHIFT * rng.standard_normal(chance.shape)
    for (s, db, bass_db, treble_db, t60, near_hz), luck_db, shift in zip(events, chance, shifts):
        grit = grains(20000, spread_db=1.2, size=len(age))
        grit *= 1 + amp(SNAP_DB - 60 * age / SNAP_T60_S)
        grit[0] = amp(crack_db)   # the first contact
        # bass rattles longest, treble shortest
        bass, middle, treble = (grit * amp(-60 * age / (max(t60, .004) * slow)) for slow in (1.5, 1, .65))
        tail = grit * amp(tail_db - 60 * age / tail_t60)
        # where it is struck favours the upper modes near one pitch
        favour_db = np.where(modes_hz < 1500, bass_db, -22 * np.abs(np.log2(modes_hz / near_hz)))
        rings = 0
        for (hz, mode_db, mode_t60), extra_db, detune in zip(modes, favour_db + luck_db, shift):
            width = np.log(1000) / (np.pi * min(mode_t60, held * t60))   # Hz, from the t60
            rings = rings + amp(mode_db + extra_db) * resonate(middle, hz * detune, width)
        centre_hz = min(near_hz, 5000)
        sound = amp(bass_db - 1.5) * band(bass + tail, low_hz, 1880)
        sound += amp(1.0) * band(middle + tail, centre_hz / 1.71, centre_hz * 1.61)
        sound += amp(treble_db + 1.5) * band(treble + tail, 6100, max(2.9 * near_hz, top_hz))
        sound += amp(ring_db) * rings
        out[round(s * SR):][:len(age)] += amp(db) * sound
    return band(out[:N] + 1e-18, low_hz, 20000, order=6)   # the offset keeps the filter off denormals


def knocks():
    """Blows at the machine ring the vise, then the tube in the hand, then the tube laid down."""
    events = np.array(KNOCKS)
    stage = np.digitize(events[:, 0], (LIFT_S, DOWN_S))
    struck = ((VISE, 17.5, .7), (LIFTED, 15, 1.3), (SET_DOWN, 13.5, 1.2))   # modes, ring dB, held
    total = sum(blows(events[stage == i], modes, low_hz=501, ring_db=ring_db, held=held,
                      crack_db=12.5, tail_db=-42.0, tail_t60=1.0, top_hz=12300)
                for i, (modes, ring_db, held) in enumerate(struck))
    return total * (TIME < MOVE_S)


def swarf():
    """Each jerk lets a handful of chips skitter over the steel in grains; single ones tick as noise."""
    skitter = coloured(grains(1200, spread_db=2.0, size=N), SWARF, SWARF_RINGS)
    tick = coloured(rng.standard_normal(N), SWARF, SWARF_RINGS)
    jerking = bursts([(s, 0, db) for s, db in JERKS], TIME, JERK_RISE_S, JERK_FALL_S)
    ticking = bursts([(s, 0, db) for s, db in TICKS], TIME, TICK_RISE_S, TICK_FALL_S)
    return tick * ticking + skitter * jerking


def taps():
    """Parts and tools set down: short blows that ring the bench modes."""
    events = np.insert(TAPS, 4, TAP_T60_S, axis=1)
    return blows(events, BENCH, low_hz=790, ring_db=16.5, held=1.0,
                 crack_db=13, tail_db=-21.5, tail_t60=0.11, top_hz=13200)


def scuffs():
    """Dense soft grains while a part drags over the bench top."""
    drag = coloured(grains(8700, spread_db=-5.0, size=N), SCUFF)
    return drag * bursts(SCUFFS, TIME, SCUFF_RISE_S, SCUFF_FALL_S)


def scene():
    """All sources in the middle; only a faint low rumble differs between the channels."""
    mid = air() + knocks() + swarf() + taps() + scuffs()
    mid[:len(RUN)] += drill()
    mid *= np.clip(np.abs(TIME - MOVE_S) / 0.0026, 0, 1)   # a short dip at the change of place
    side = amp(SIDE_DB) * rms_one(band(rng.standard_normal(N), 17, 220))
    return np.array([mid + side, mid - side])


def record(dry):
    """The microphone's top is cut by a steep elliptic low-pass."""
    return signal.sosfilt(signal.ellip(12, .5, 70, CUTOFF_HZ, fs=SR, output="sos"), dry)


dry = scene()
out = record(dry)
master(out)
```